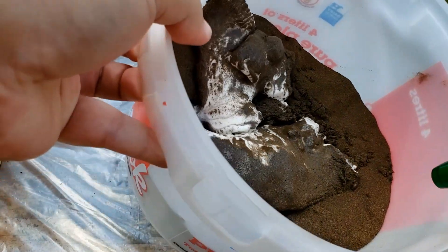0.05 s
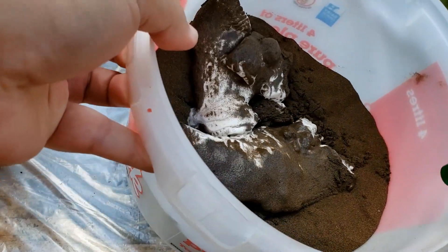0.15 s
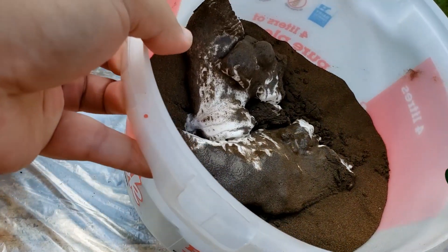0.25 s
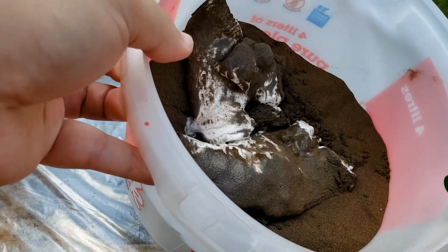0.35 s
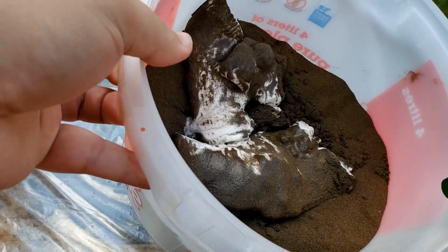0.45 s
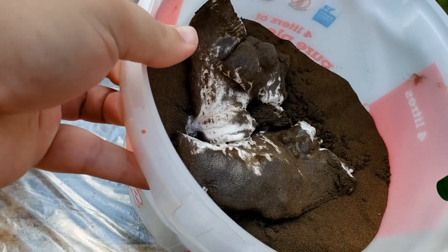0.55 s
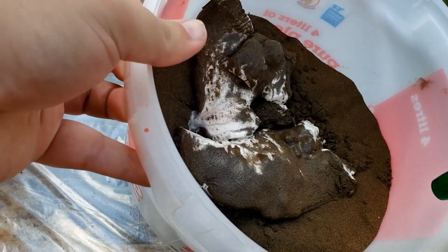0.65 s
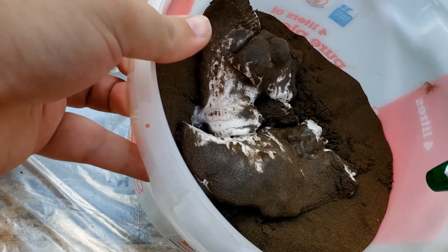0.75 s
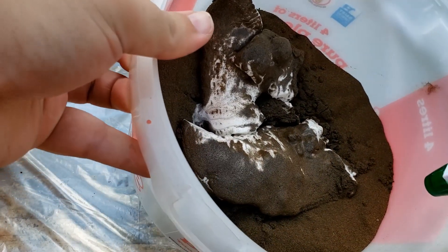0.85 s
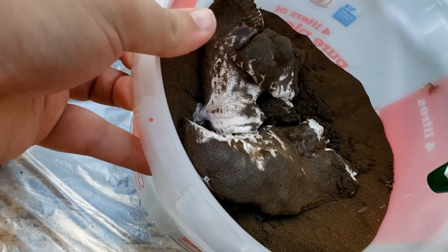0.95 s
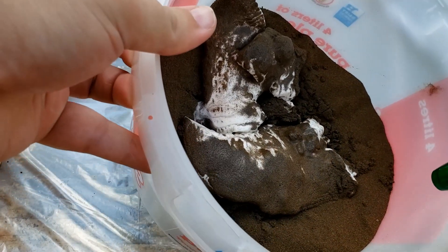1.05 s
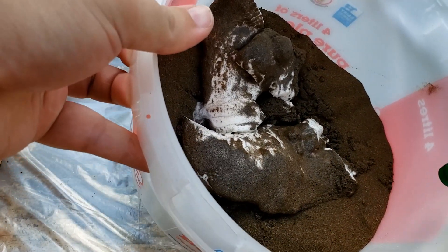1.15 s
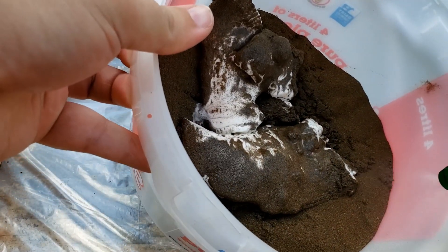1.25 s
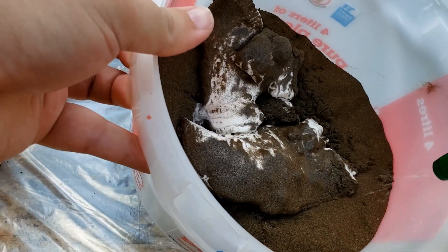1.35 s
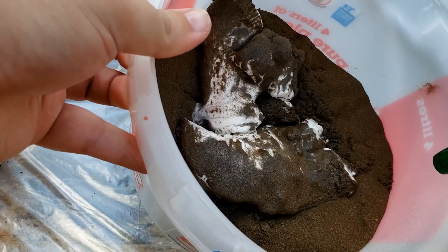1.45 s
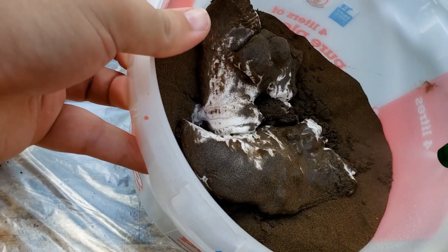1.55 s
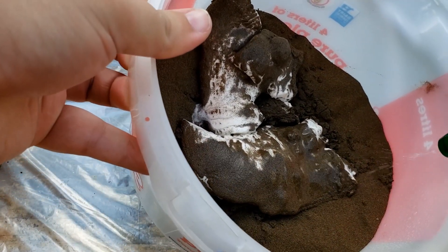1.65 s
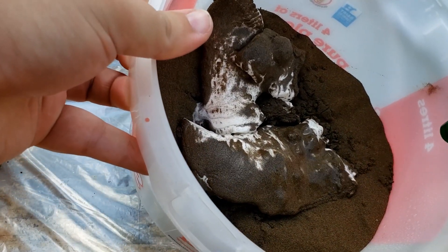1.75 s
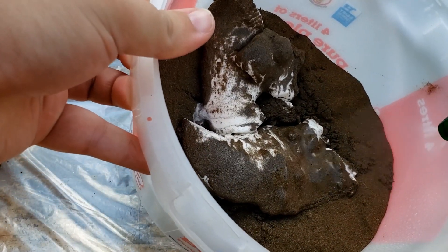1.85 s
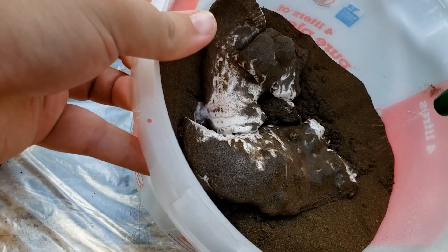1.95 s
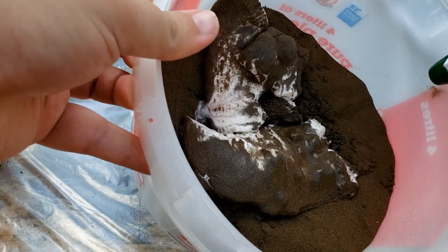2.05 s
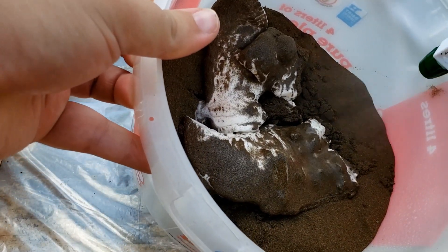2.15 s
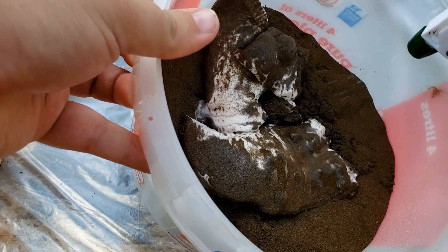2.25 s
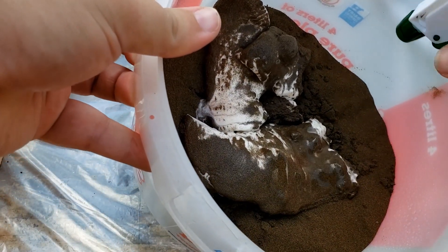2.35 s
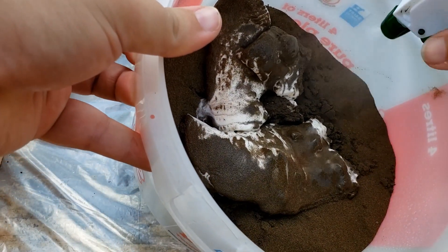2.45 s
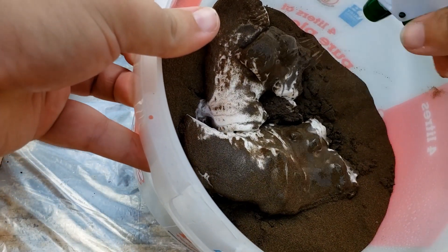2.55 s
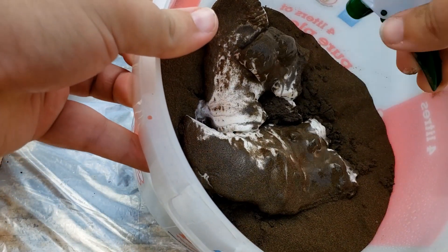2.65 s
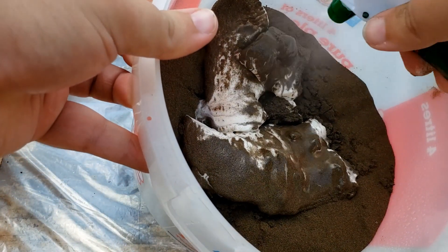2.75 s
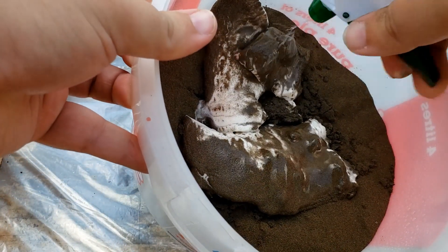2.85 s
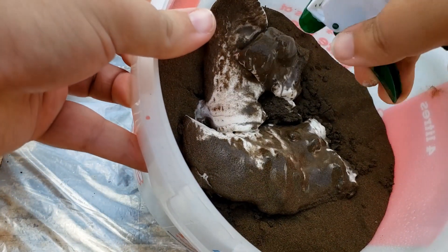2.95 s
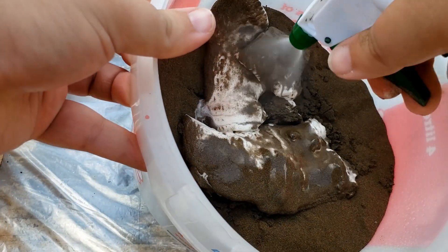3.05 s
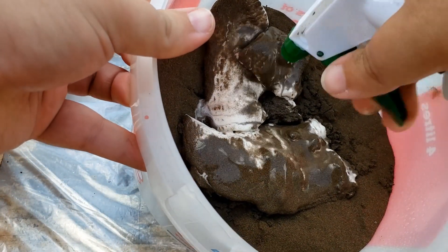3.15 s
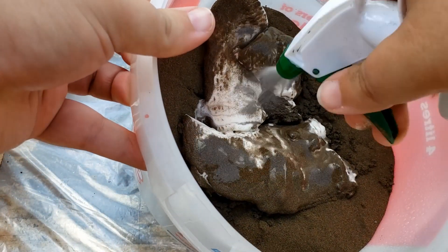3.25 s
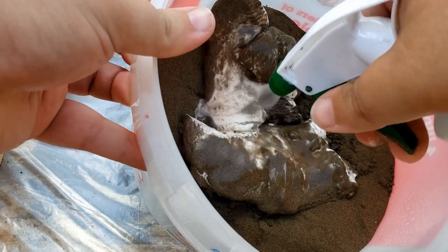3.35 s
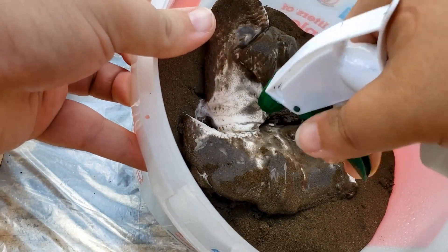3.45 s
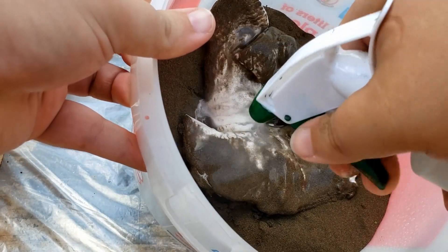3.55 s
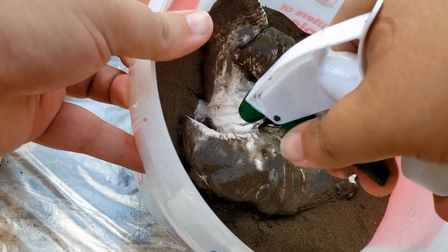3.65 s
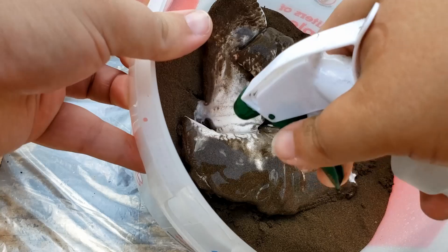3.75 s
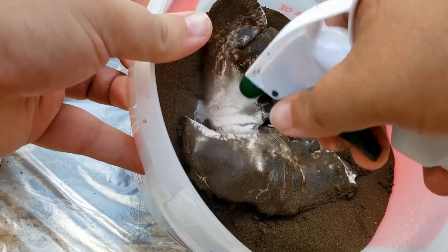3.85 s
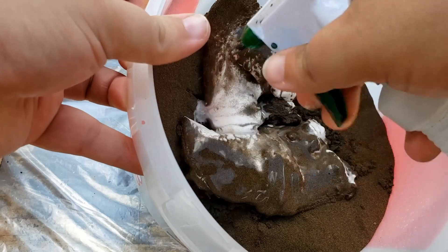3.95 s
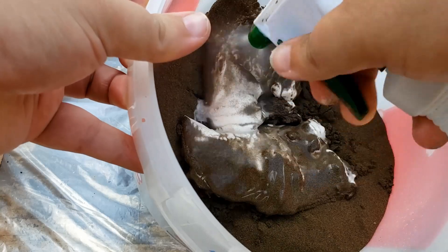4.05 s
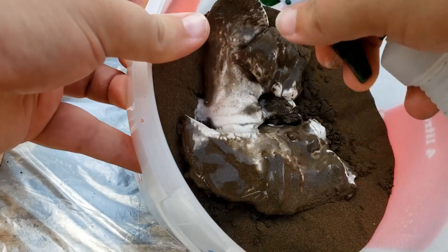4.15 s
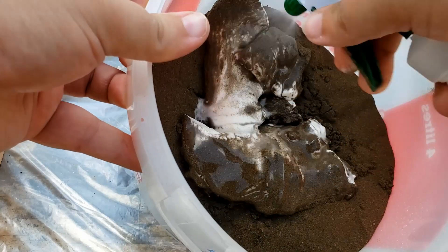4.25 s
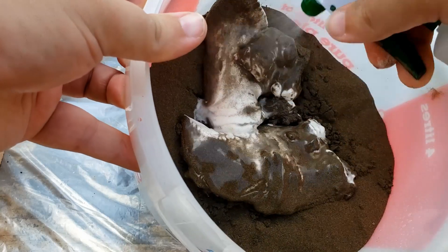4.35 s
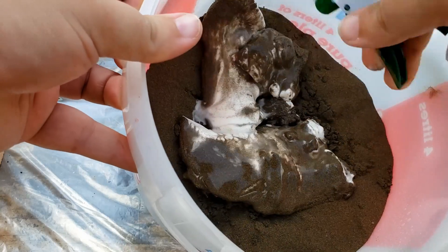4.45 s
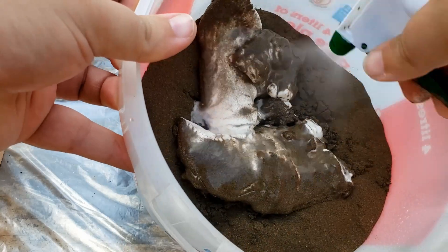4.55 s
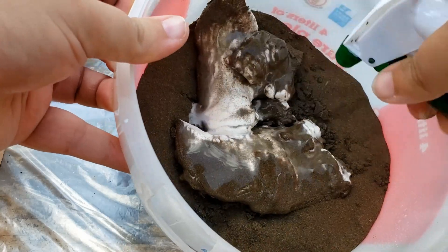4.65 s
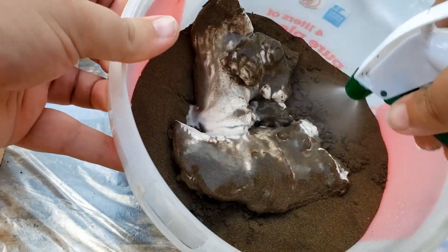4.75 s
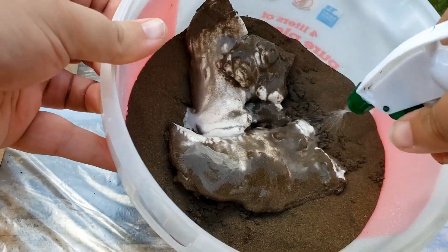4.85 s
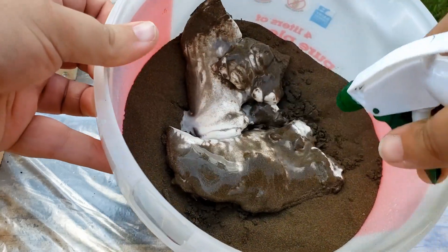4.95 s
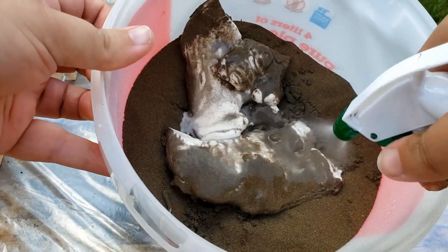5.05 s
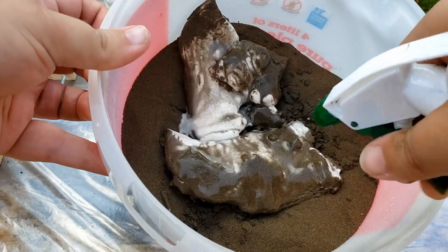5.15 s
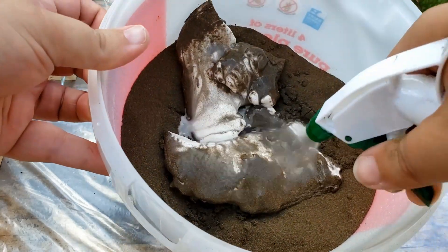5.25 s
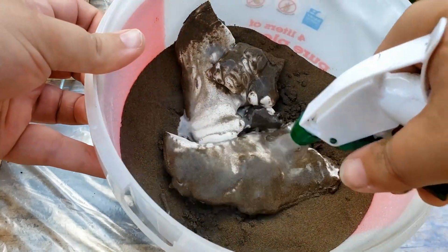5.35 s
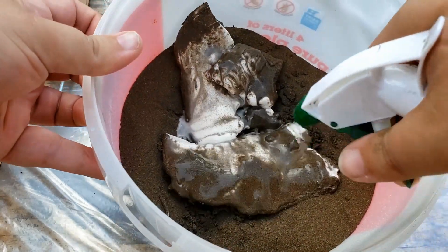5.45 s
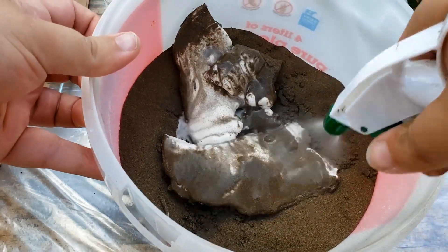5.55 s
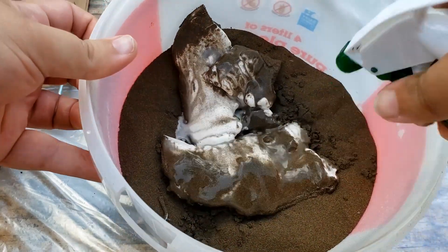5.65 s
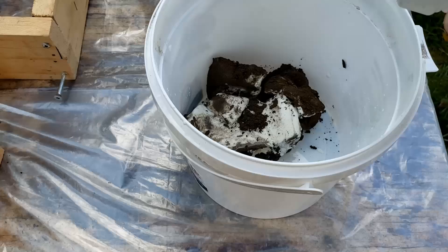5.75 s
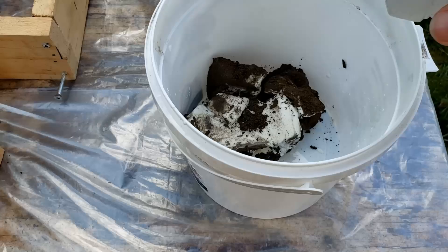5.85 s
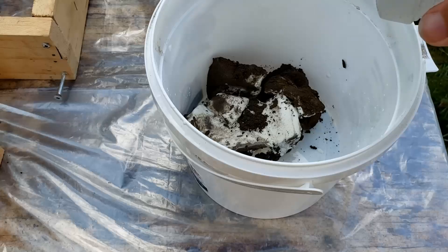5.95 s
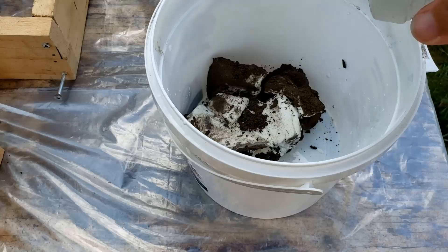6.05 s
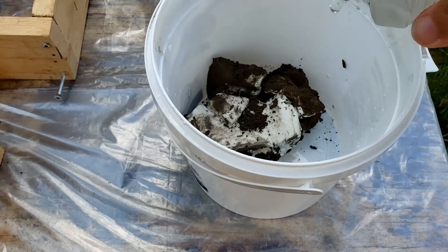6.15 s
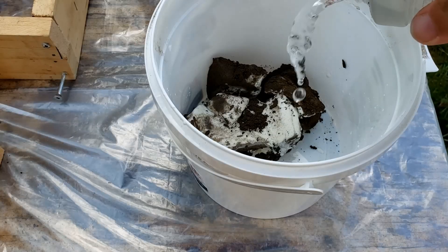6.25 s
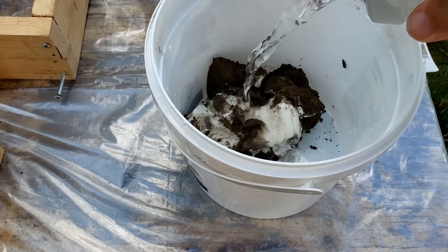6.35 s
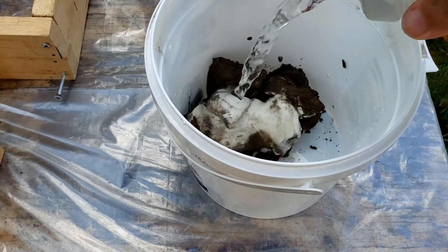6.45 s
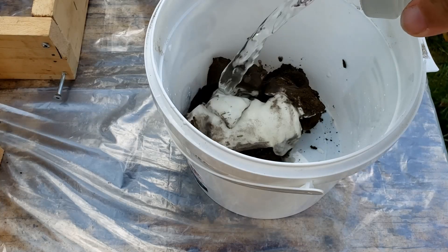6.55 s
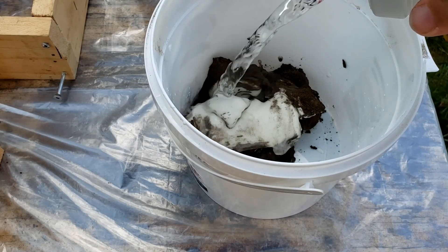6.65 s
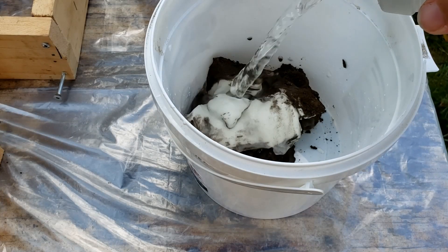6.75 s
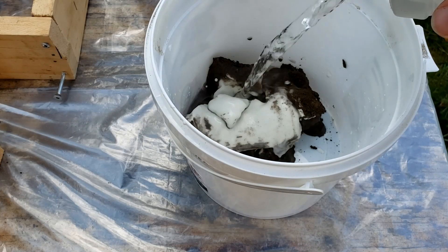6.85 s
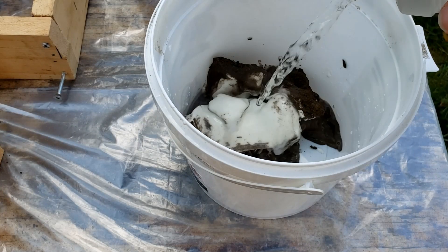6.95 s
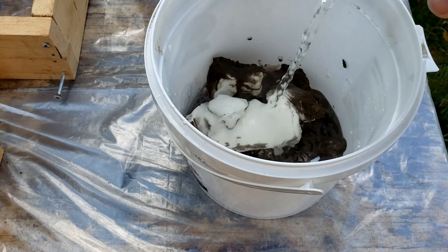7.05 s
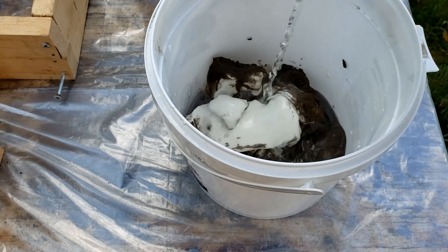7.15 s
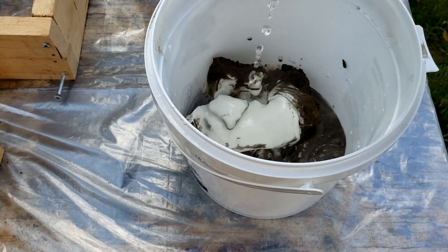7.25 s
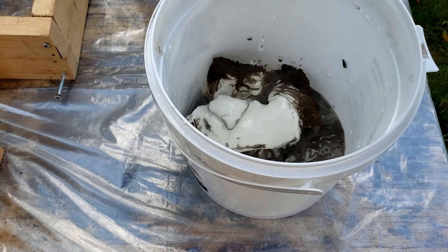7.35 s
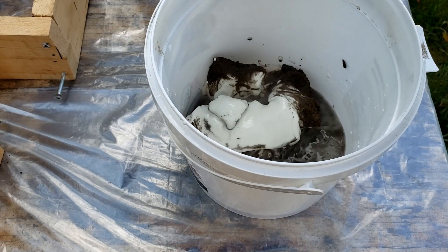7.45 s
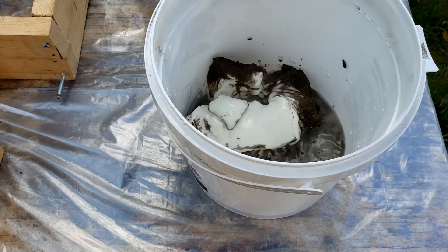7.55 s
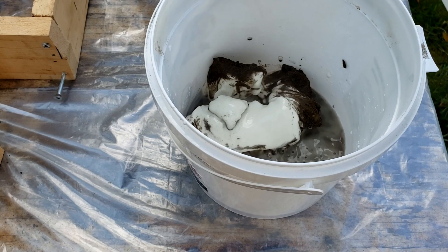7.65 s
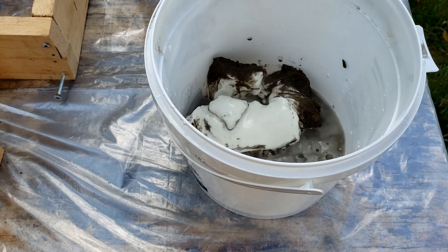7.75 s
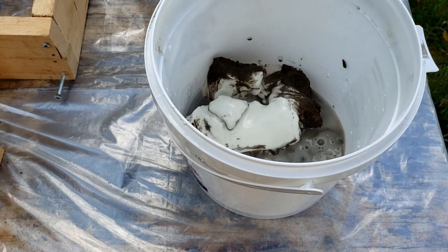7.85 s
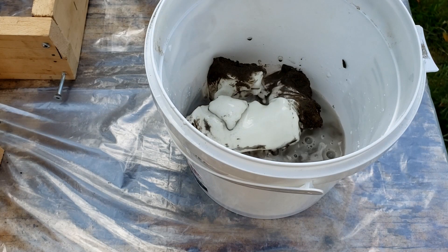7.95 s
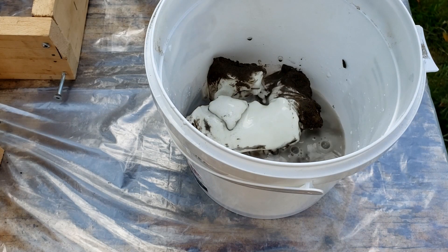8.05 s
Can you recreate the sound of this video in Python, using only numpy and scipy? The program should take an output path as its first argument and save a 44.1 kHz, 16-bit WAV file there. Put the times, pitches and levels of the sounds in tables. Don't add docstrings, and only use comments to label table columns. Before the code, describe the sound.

Close dry trigger clicks and sputters become rhythmic hissing spray bursts pattering on damp sand, a sharp plastic knock, then a short gurgling water pour outdoors.

```python
import sys
import numpy as np
from scipy import signal
from scipy.fft import rfft, irfft, next_fast_len
from scipy.io import wavfile
from scipy.ndimage import map_coordinates

SR = 44100
rng = np.random.default_rng(int(sys.argv[2]) if len(sys.argv) > 2 else 0)


def generate_wav(signal):
    frames = np.transpose(np.atleast_2d(signal))
    scaled = np.clip(frames, -1, 1) * 32767
    pcm = np.round(scaled).astype(np.int16)
    wavfile.write(sys.argv[1], SR, pcm)


def volts_from_db(level):
    exponent = np.asarray(level, float) / 20
    return 10 ** exponent


N = 357651
MOVE_S = 5.85

# frequency in Hz, density in dB per Hz.
AIR_NEAR_SPECTRUM = [(15, -41.5), (25, -8.5), (86, -2.5), (133, -1.5), (184, -16.5), (283, -13),
                     (788, -21.5), (926, -26), (2380, -32), (2650, -27), (3470, -45), (4930, -40),
                     (8910, -56), (11700, -45.5), (15700, -52)]
# frequency in Hz, density in dB per Hz.
AIR_FAR_SPECTRUM = [(15, -44), (25, -20), (64, 0), (96, -4.5), (184, -19), (234, -22.5), (380, -22.5),
                    (586, -29), (788, -32), (2650, -48.5), (4670, -57), (6810, -61.5), (9930, -65.5),
                    (12000, -55), (15700, -54.5)]
# frequency in Hz, likeness 0-1.
AIR_LIKENESS = [(25, .6), (60, 0.96), (130, 0.8), (290, .75), (640, 0.18), (1400, 0.02), (16000, 0.02)]
# frequency in Hz, width in Hz, level near the bucket in dB re load, level further off in dB.
MOTOR_ORDERS = [(63, 13, -2, -4), (88.97, 4.4, -1, -2), (149.6, 9.3, -8.5, -17.5), (176.3, 5.3, -16, -8.5)]
# time in seconds, level in dB.
MOTOR_LOAD = [(0.0, -43.5), (0.16, -52.5), (0.45, -53.5), (0.7, -54.5), (2.1, -50.5), (3.0, -51.5),
              (4.0, -50), (5.5, -56), (5.92, -51.5), (6.6, -50), (6.93, -50), (7.43, -51.5), (7.91, -45.5),
              (8.1, -47)]
# centre in seconds, length in seconds, start pitch in Hz, end pitch in Hz, level in dB.
CHIRPS = [
    (6.04, 0.12, 7190, 7613, -93.5),
    (6.177, 0.25, 7904, 8350, -90.5),
    (6.375, 0.062, 7707, 7760, -82.5),
    (7.759, .09, 8300, 8400, -83),
    (7.844, 0.104, 7580, 7530, -78),
    (8.081, 0.07, 8210, 8070, -86),
]

# start in seconds, length in seconds, hiss level in dB, mist level in dB.
PRIMING = [
    (0.0, 0.056, -69.5, -67.5),
    (0.095, 0.087, -74, -74.5),
    (0.275, 0.058, -46, -55.5),
    (0.42, 0.055, -65.5, -73),
    (0.578, 0.046, -56, -57),
    (0.764, 0.034, -69, -75),
    (0.933, 0.091, -50.5, -62.5),
    (1.058, 0.051, -61, -71),
]
# start in seconds, length in seconds, hiss level in dB, mist level in dB, fade in dB.
STROKES = [(1.281, 0.13, -41.5, -44, 10), (1.593, 0.12, -42.5, -43.5, 1.5),
           (1.887, 0.12, -42.5, -43.5, -0.5), (2.192, 0.097, -42.5, -42, -3),
           (2.484, 0.11, -43.5, -42.5, 2), (2.777, 0.11, -40.5, -41, -0.5), (3.071, 0.11, -42, -43, 1),
           (3.339, 0.1, -43.5, -43, -4), (3.594, 0.11, -40.5, -41, -3.5), (3.863, 0.11, -41, -42.5, 6.5),
           (4.104, 0.099, -40.5, -42.5, 1.5), (4.333, 0.11, -38.5, -42, -4),
           (4.577, 0.12, -38.5, -41.5, 7.5), (4.819, 0.11, -41.5, -42.5, -2.5),
           (5.078, 0.1, -39.5, -40.5, 5.5), (5.333, 0.1, -40.5, -41.5, -1), (5.569, 0.11, -41.5, -42, 8),
           (5.812, 0.019, -53.5, -54, 18)]
# share of its length, hiss gain in dB, mist gain in dB.
PRESSURE = [
    (-.2, -31.5, -28.5),
    (0., -6, -8.5),
    (.15, -2, 0.5),
    (.45, 2.5, 5),
    (.7, 0.5, 5),
    (1., -7, -6.5),
    (1.25, -26.5, -24),
    (2.2, -27.5, -24),
    (3.5, -68, -63.5),
]
# frequency in Hz, density in dB per Hz.
NOZZLE_SPECTRUM = [(1470, -27.5), (2500, -2), (3030, -21.5), (3670, 4.5), (4220, -3), (4810, 0.5),
                   (5310, -1), (7110, -12), (8360, -12), (11100, 0.5), (15100, 2), (15700, 2)]
# frequency in Hz, density in dB per Hz.
MIST_SPECTRUM = [(180, -50), (300, -12.5), (482, -2), (1260, -3), (1660, -4), (1920, -1), (2310, -4),
                 (2860, -3), (7000, -11.5), (9100, -50.5), (15400, -120)]
# frequency in Hz, width in Hz, level in dB.
WHISTLES = [(11250, 500, -5.5), (15200, 1000, 0.5), (4700, 400, -2.5), (6500, 500, -5.)]
# time in seconds, peak in dB, centre in Hz.
NOZZLE_SPITS = [(1.2826, -23, 14900), (1.352, -34, 15200), (1.583, -38, 15000), (2.1981, -50, 15300),
                (2.2005, -30, 11650), (2.7792, -37, 14900), (3.3514, -32, 14300), (3.5625, -45, 10400),
                (4.0938, -42, 15000), (4.1097, -37, 14900), (4.3362, -28, 15300), (4.337, -35.5, 11000),
                (4.5742, -30, 11400), (4.600, -23, 11400), (4.601, -26, 14740), (5.5539, -32, 12000)]
# time in seconds, share inside the bucket 0-1, position across (0 middle, about
AIM = [(.3, 1, 1.6, 0.2), (.97, 0.64, 2.2, 0), (1.35, 0., 0.23, .1), (1.65, 0.15, 0.45, .1),
       (1.95, 0.04, -0.29, 0.3), (2.24, 0.5, -0.67, 0.2), (2.53, 0.59, -0.87, 0.62),
       (2.83, 0.82, 0.058, 0.4), (3.12, 1, -1.4, 0.23), (3.391, 0.98, -1.2, 0), (3.65, 0.92, -0.37, 0.35),
       (3.91, 1.01, -0.68, 0.7), (4.15, 1, -0.11, 1), (4.39, 1, 0.54, 0.7), (4.63, 1, -0.16, 0.23),
       (4.87, 0.86, -0.066, 0.97), (5.13, 0.73, 0.69, 0), (5.39, 0.94, 1.1, 0), (5.62, 0.89, 0.38, 0.03)]
# frequency in Hz, width in Hz.
BUCKET_MODES = [(1360, 670), (2050, 560), (2870, 270), (3650, 700)]
# level from outside in dB, level from inside in dB,
# dB per unit across, dB per unit down.
MODE_AIM = [(-26.5, -11, -7.5, 12), (-1.5, -6.5, 6.5, 3.5), (-24.5, 0, 5.5, -6), (-14.5, 6, 3.5, -4.5)]
# frequency in Hz, width in Hz.
RIM_NOTCHES = [(1600, 670), (2950, 150), (4200, 110)]

# time in seconds, ring peak in dB, crack in dB, thump in dB.
PULLS = [(0.2449, -39, -46, -42), (0.2883, -49, -36.5, -63), (0.5915, -37, -47, -46.5),
         (0.957, -43, -41.5, -59), (1.259, -36, -45, -64), (1.581, -43, -42, -38),
         (1.8335, -55, -41.5, -42), (1.8777, -43.5, -49, -48), (2.162, -38, -37.5, -35.5),
         (2.1969, -44, -36.5, -42.5), (2.4685, -36, -38.5, -42), (2.755, -33.5, -51, -46),
         (3.0518, -53, -34.5, -35), (3.3261, -39, -37.5, -38.5), (3.5856, -40, -33, -30.5),
         (3.8533, -32, -34.5, -31.5), (4.3223, -48, -48, -40), (4.574, -29, -33, -34),
         (4.808, -31, -41, -40.5), (5.0529, -41, -38.5, -37), (5.3158, -25, -40.5, -36.5),
         (5.554, -54, -36.5, -36.5), (5.801, -44, -44, -37.5)]
# time in seconds, peak in dB.
RETURNS = [(0.019, -57), (0.104, -45), (2.015, -47), (2.912, -54), (3.2405, -45), (3.5346, -45),
           (3.7597, -40.5), (4.043, -42), (4.2616, -38), (4.49, -41), (4.752, -38), (5.2541, -39.5),
           (5.494, -39), (5.7266, -37.5)]
# time in seconds, peak in dB.
VALVE = [(0.154, -34), (0.8056, -38.5), (0.87, -46), (2.6882, -37.5), (2.9863, -34), (3.0444, -33.5),
         (3.2678, -34), (3.319, -35.5), (3.798, -34), (4.06, -42), (4.285, -42), (4.5313, -29.5),
         (5.2745, -36)]
# time in seconds, peak in dB.
SLACK = [
    (0.2575, -45.5),
    (1.0688, -52),
    (1.8653, -42.5),
    (2.136, -43),
    (2.4204, -44.5),
    (3.013, -46.5),
    (3.2934, -47),
    (3.5631, -45),
    (3.8254, -45.5),
    (4.0837, -47),
]
# time in seconds, peak in dB.
TICKS = [(.2179, -43), (.4614, -46), (.5616, -49), (.889, -42), (1.1164, -43.5), (1.129, -47),
         (1.2738, -28.5), (1.587, -39), (2.392, -49), (2.399, -52), (2.461, -42), (2.681, -44),
         (2.9809, -44), (3.2268, -54), (3.5356, -48), (3.578, -39), (3.7761, -53), (3.787, -42),
         (3.8474, -37), (4.016, -68), (4.054, -49), (4.2809, -51), (4.3263, -48), (4.527, -40),
         (4.568, -32), (4.5788, -30), (4.781, -46.5), (5.558, -36)]
# ring, crack, thump, all in dB re its peak.
RETURN_MIX = (-10, -39, 0.)
VALVE_MIX = (-1.4, -20.5, -14.5)
SLACK_MIX = (-30.5, 0., -1.4)
TICK_MIX = (1.5, -24, -16)
# frequency in Hz, level in dB, T60 in seconds.
PLASTIC_MODES = [(2460, -17.5, 0.034), (2850, 2.5, 0.018), (3600, -6.5, 0.0091), (4816, -16.5, 0.0081)]
# frequency in Hz, level in dB, T60 in seconds.
HOUSING_MODES = [(262, -5, 0.062), (363.4, 2.5, 0.039)]
# frequency in Hz, density in dB per Hz.
CRACK_SPECTRUM = [(1200, -26), (2500, 0), (3800, -4), (6500, -5), (8300, -24), (11000, -8), (15500, -9)]
# time in seconds, peak in dB, pitch in Hz, T60 in seconds.
SLOSH = [
    (0.0162, -35, 1230, 0.014),
    (0.019, -45, 1370, 0.027),
    (0.0418, -40, 1400, 0.016),
    (0.054, -40, 1380, 0.015),
    (0.09, -43, 1810, 0.041),
    (0.107, -42, 1290, 0.021),
]

# time in seconds, peak in dB.
SNAP = [
    (5.107, -6.5),
]
# frequency in Hz, level in dB, T60 in seconds.
SHELL_MODES = [(262, -34, 0.027), (1400, -8, 0.025), (2220, 2.5, 0.0071), (2850, -2.5, 0.022),
               (4700, -14, .005)]

# time in seconds, flow as splash level in dB, trapped air as gurgle level in dB.
POUR = [
    (6.39, -78, -84.5),
    (6.45, -61, -82),
    (6.584, -56, -49),
    (6.71, -56.5, -41.5),
    (6.85, -57, -50),
    (6.95, -52.5, -55.5),
    (7.05, -60.5, -55.5),
    (7.3, -66, -82),
    (7.58, -77, -82),
]
# frequency in Hz, density in dB per Hz.
SPLASH_SPECTRUM = [(760, -28), (1300, -20), (1490, -9), (2040, -13), (2480, -11.5), (2990, -11.5),
                   (3650, -10.5), (3970, -7), (8580, -22.5), (11100, -15.5), (15700, -12.5)]
# frequency in Hz, width in Hz, level in dB.
FAR_BUCKET_MODES = [(1520, 130, -5), (1773, 430, -0.5), (2590, 450, 1.5), (3630, 160, 6.5),
                    (5330, 920, 7.5)]
# time in seconds, peak in dB, pitch in Hz.
DROPS = [(6.4101, -45, 5740), (6.4323, -51, 4300), (6.4528, -48, 3820), (6.4804, -40, 3630),
         (6.493, -45, 4030), (6.502, -42, 2650), (6.518, -35, 1558), (6.54, -24, 4660), (6.576, -37, 3620),
         (6.581, -34.5, 1600), (6.59, -29, 3600), (6.596, -26, 3620), (6.5992, -34, 2430),
         (6.624, -35, 5770), (6.6548, -42, 1350), (6.6646, -37, 1350), (6.681, -22.5, 1460),
         (6.686, -42, 1480), (6.7046, -30, 1330), (6.7266, -26.5, 1520), (6.8186, -42, 1570),
         (6.8258, -39, 1600), (6.8373, -31, 1750), (6.851, -29, 3600), (6.898, -25.5, 2400),
         (6.946, -24, 3220), (6.9655, -26, 3550), (6.988, -28, 3570), (7.002, -30, 2620),
         (7.019, -32, 1470), (7.0403, -30, 3370), (7.013, -33, 3300), (7.045, -42, 1400),
         (7.059, -39, 1510), (7.072, -40, 2520), (7.074, -45.5, 1618), (7.088, -41, 1500),
         (7.11, -51, 2310), (7.1505, -56, 5340), (7.168, -49, 3750), (7.2195, -42, 3690),
         (7.2802, -38, 3620), (7.286, -38, 2740), (7.297, -33, 2800), (7.304, -27.5, 3290),
         (7.311, -31, 3500), (7.221, -42, 2000), (7.199, -48, 3660), (7.316, -38, 1695), (7.348, -34, 2850),
         (7.3737, -51.5, 3680), (7.408, -53.5, 3630)]
# time in seconds, peak in dB, pitch in Hz, T60 in seconds.
DRIPS = [(7.4883, -50, 1610, 0.022), (7.524, -33, 3010, 0.014), (7.5344, -30, 1880, 0.011),
         (7.5706, -40.5, 1650, 0.039), (7.587, -40, 1609, 0.057), (7.594, -34, 1950, 0.02),
         (7.536, -55, 3150, 0.045), (7.548, -45, 1700, .015), (7.574, -53, 4100, 0.033),
         (7.61, -54, 1620, .05), (7.628, -58, 2300, .03), (7.659, -57, 1430, .04)]
# time in seconds, peak in dB, centre in Hz.
POUR_SPITS = [(6.4116, -36, 11100), (6.4135, -42, 7300), (6.513, -35, 10500), (6.5182, -30.5, 9300),
              (6.5395, -37, 14500), (6.5959, -55.5, 13100), (6.663, -38, 8600), (6.7784, -50, 14800),
              (6.8154, -35, 13400), (6.827, -42, 7400), (6.869, -34, 12600), (6.8972, -41, 6690),
              (6.9141, -47, 6000), (6.9455, -44, 6920), (6.9458, -38, 4500), (6.9462, -40.5, 11000),
              (6.99, -39, 12500), (7.001, -38, 12500), (7.02, -39, 12000), (7.0398, -40, 5410),
              (7.0722, -46, 5600), (7.104, -55, 6500), (7.117, -58, 5200), (7.129, -56, 6300),
              (7.145, -51.5, 6500), (7.157, -50, 5800), (7.17, -51, 5600), (7.191, -45, 5890),
              (7.199, -49.5, 6500), (7.2164, -46, 5160), (7.229, -42, 4150), (7.238, -52, 6000),
              (7.259, -44, 4250), (7.2793, -44, 5330), (7.333, -50, 4320), (7.3735, -53, 4880),
              (7.4095, -51, 5030), (7.4599, -54, 5420), (7.5496, -56, 6570), (7.1506, -46, 12800),
              (7.2609, -50, 14200), (7.2883, -42, 11300), (7.306, -38, 5500), (7.3135, -32, 13000),
              (7.315, -34, 6000), (7.3465, -30.5, 10200), (7.4085, -41, 11470), (7.4893, -50, 4533),
              (7.5243, -41.5, 6500), (7.572, -47, 5540), (7.593, -57, 4000)]

# frequency in Hz, likeness 0-1.
CLOSE_LIKENESS = [(30, 0.65), (70, 0.88), (400, 0.86), (1500, 0.7), (4000, 0.21), (9000, 0.19),
                  (16000, 0.16)]
# time in seconds, lag in samples.
LEFT_LAG = [(0, 7), (2.3, 5.5), (3.2, 1), (4.3, 2.5), (5.2, 4.5), (5.8, 2), (8.1, -3)]
# frequency in Hz, left minus right in dB.
PORT_TILT = [(60, 0), (140, 2.5), (400, 1.5), (2000, 2.), (3500, 3.5), (5500, .5), (7000, -5), (7800, -13),
             (8400, -8), (9200, -9.5), (10000, -9.5), (11500, -4), (13000, -3), (15500, 3.5)]


def rms_one(x):
    return x / np.sqrt(np.mean(x ** 2) + 1e-20)


def in_time(rows):
    s, *columns = np.transpose(sorted(rows))
    return [np.interp(np.arange(N) / SR, s, column) for column in columns]


def coloured(x, points):
    size = next_fast_len(N + SR // 10, True)
    edge = (size - N) // 2
    padding = [(0, 0)] * (np.ndim(x) - 1) + [(edge, size - N - edge)]
    wide = np.pad(x, padding, mode="reflect")
    bin_hz = np.maximum(np.arange(size // 2 + 1) * SR / size, 1)
    hz, gain = np.transpose(points)
    weight = np.interp(np.log(bin_hz), np.log(hz), gain)
    return irfft(rfft(wide) * weight, size)[..., edge:edge + N]


def shaped(x, spectrum):
    fine_hz = np.geomspace(10, SR / 2, 300)
    hz, db = np.transpose(spectrum)
    gain = volts_from_db(np.interp(np.log(fine_hz), np.log(hz), db))
    return rms_one(coloured(x, np.c_[fine_hz, gain]))


def pair(mid, side, likeness=CLOSE_LIKENESS):
    hz, alike = np.transpose(likeness)
    alike = np.clip(alike, 0, 1)
    mid = coloured(mid, np.c_[hz, np.sqrt(1 + alike)])
    side = coloured(side, np.c_[hz, np.sqrt(1 - alike)])
    return np.array([mid + side, mid - side])


def noise(likeness=CLOSE_LIKENESS):
    return pair(*rng.standard_normal((2, N)), likeness)


def drift(rate_hz):
    r = np.exp(-32 * np.pi * rate_hz / SR)
    white = rng.standard_normal((N + SR) // 16 + 2)
    slow = signal.lfilter([1], [1, -2 * r, r * r], white)[SR // 16:]
    return np.interp(np.arange(N) / 16, np.arange(len(slow)), rms_one(slow))


def ring(impulses, hz, t60_s):
    r, w = volts_from_db(-60 / (t60_s * SR)), 2 * np.pi * hz / SR
    return signal.lfilter([0, np.sin(w)], [1, -2 * r * np.cos(w), r * r], impulses + 1e-18)


def resonate(x, hz, width_hz):
    r = np.exp(-np.pi * width_hz / SR)
    alive = x + 1e-15 * (np.arange(np.shape(x)[-1]) % 3)
    zeros = np.array([1, 0, -1]) * (1 - r * r) / 2
    return signal.lfilter(zeros, [1, -2 * r * np.cos(2 * np.pi * hz / SR), r * r], alive)


def clicks(times_s, db):
    out = np.zeros(N)
    out[np.round(np.asarray(times_s) * SR).astype(int)] = volts_from_db(np.asarray(db))
    return out


def dying(impulses, t60_s):
    return signal.lfilter([1], [1, -volts_from_db(-60 / (t60_s * SR))], impulses + 1e-18)


def grains(per_s, spread_db):
    sizes = volts_from_db(spread_db * np.minimum(rng.exponential(1, N), 5)) * rng.choice([-1, 1], N)
    return sizes * (rng.random(N) < per_s / SR)


def in_bucket(x, modes, ring_db):
    return x + volts_from_db(ring_db) * sum(volts_from_db(db) * resonate(x, hz, width_hz) for hz, width_hz, db in modes)


def soft(x, cut_hz):
    return signal.sosfilt(signal.butter(2, cut_hz, fs=SR, output="sos"), x)


def outdoors():
    t = np.arange(N) / SR
    far = np.clip((t - MOVE_S) / 0.0029, 0, 1)
    white = noise(AIR_LIKENESS)
    air = (1 - far) * volts_from_db(-53) * shaped(white, AIR_NEAR_SPECTRUM)
    air = air + far * volts_from_db(-50.0) * shaped(white, AIR_FAR_SPECTRUM)
    white = noise(AIR_LIKENESS)
    drone = 0
    for hz, width_hz, near_db, far_db in MOTOR_ORDERS:
        order = resonate(resonate(white, hz, width_hz), hz, 3 * width_hz)
        drone = drone + volts_from_db(near_db + (far_db - near_db) * far) * rms_one(order)
    gust_db = 1.65 * (1 - 0.58 * far) * (drift(3.2) + 0.67 * drift(16))
    air = air * volts_from_db(gust_db)
    rasp = drift(250)
    for s, length_s, from_hz, to_hz, db in CHIRPS:
        half_s = length_s / 2
        hz = np.interp(t, [s - half_s, s + half_s], [from_hz, to_hz])
        phase = 2 * np.pi * np.cumsum(hz) / SR
        air += volts_from_db(db) * np.exp(-((t - s) / half_s) ** 2) * rasp * np.sin(phase)
    return air + volts_from_db(in_time(MOTOR_LOAD)[0]) * drone


def squeezes():
    t = np.arange(N) / SR
    share, *curves_db = np.transpose(sorted(PRESSURE))
    gains = np.zeros((2, N))
    bites_s = np.array(PULLS)[:, 0]
    for s, length_s, hiss_db, mist_db, fade_db in [(*row, 0) for row in PRIMING] + STROKES:
        near_bites_s = bites_s[np.abs(bites_s - s) < .012]
        start_s = max([s + share[0] * length_s, *near_bites_s])
        part = slice(max(round(start_s * SR), 0), round((s + share[-1] * length_s) * SR))
        done = (t[part] - s) / length_s
        fade = fade_db * (np.clip(done, 0, 1) - .5)
        gains[:, part] += [volts_from_db(db + np.interp(done, share, curve_db) - fade)
                           for db, curve_db in zip((hiss_db, mist_db), curves_db)]
    return gains * (t < MOVE_S)


def spits(rows):
    out, size = np.zeros(N), SR // 50
    decay = volts_from_db(-60 * np.arange(size) / (0.012 * SR))
    for (s, peak_db, hz), burst in zip(rows, rng.standard_normal((len(rows), size))):
        burst = burst + 5.7 * (np.arange(size) == 0)
        one = resonate(burst * decay, hz, 0.13 * hz)
        start = round(s * SR)
        out[start:start + size] += volts_from_db(peak_db) * one / np.abs(one).max()
    return out


def spray():
    hiss, mist = squeezes()
    inside, across, down = in_time(AIM)
    unprimed = np.arange(N) < 1 * SR
    sputter = volts_from_db(2 * drift(78) * unprimed)
    patter = shaped(pair(grains(9000, spread_db=1.5), grains(9000, spread_db=1.5)), MIST_SPECTRUM)
    modes = []
    for (hz, width_hz), (out_db, in_db, across_db, down_db) in zip(BUCKET_MODES, MODE_AIM):
        aim_db = out_db + (in_db - out_db) * inside + across_db * across + down_db * down
        modes.append((hz, width_hz, aim_db + 1.1 * drift(4.4)))
    landing = in_bucket(patter, modes, ring_db=-1.2)
    turbulence = shaped(noise(), NOZZLE_SPECTRUM)
    whistles = [(hz, width_hz, db + 7.5 * drift(9.)) for hz, width_hz, db in WHISTLES]
    swirl = in_bucket(turbulence, whistles, ring_db=-7.5)
    jet = hiss * volts_from_db(2.0 + 1.1 * drift(50)) * swirl
    jet = jet + mist * volts_from_db(-2.5 + 1.63 * drift(51)) * landing
    jet = jet * sputter + spits(NOZZLE_SPITS)
    at_rim = np.clip(0.9 + (.14 - 0.9) * inside, 0, 1)
    return jet - at_rim * sum(resonate(jet, hz, width_hz) for hz, width_hz in RIM_NOTCHES)


def contacts():
    kinds = ((RETURNS, RETURN_MIX), (VALVE, VALVE_MIX), (SLACK, SLACK_MIX), (TICKS, TICK_MIX))
    others = [(s, *(db + np.array(mix))) for rows, mix in kinds for s, db in rows]
    return np.transpose(PULLS + others)


def struck(times_s, peak_db, modes, uneven_db):
    luck_db = uneven_db * rng.standard_normal((len(times_s), len(modes)))
    return sum(ring(clicks(times_s, peak_db + db + luck_db[:, k]), hz, t60_s)
               for k, (hz, db, t60_s) in enumerate(modes))


def drop(hz, t60_s, rise):
    done = np.arange(int(t60_s * SR)) / (t60_s * SR)
    tone = np.sin(2 * np.pi * hz * t60_s * done * (1 + rise * done))
    return tone * (1 - np.exp(-14 * done)) * volts_from_db(8.0 - 60 * done)


def drops(rows):
    out = np.zeros(N)
    for s, peak_db, hz, t60_s, *_ in rows:
        one = drop(hz, t60_s, rise=0.019)
        start = round(s * SR)
        out[start:start + len(one)] += volts_from_db(peak_db - 8.0) * one
    return out


def trigger():
    s, ring_db, crack_db, thump_db = contacts()
    shut_s = np.array(VALVE)[:, 0]
    refill = np.cumsum(clicks(shut_s - 0.051, 0) - clicks(shut_s, 0))
    creaks_per_s = (22 + 92 * refill) * (np.arange(N) < MOVE_S * SR)
    creak_s = np.flatnonzero(rng.random(N) < creaks_per_s / SR) / SR
    grip_db = 4.5 * drift(7.3)[(creak_s * SR).astype(int)]
    creak_db = -64 + grip_db + 3.0 * rng.standard_normal(len(creak_s))
    pops = struck(s, ring_db - 4.5, PLASTIC_MODES, uneven_db=-1.0)
    pops += struck(s + 0.001169, ring_db - 7.5, PLASTIC_MODES, uneven_db=2.0)
    pops += struck(creak_s, creak_db, PLASTIC_MODES, uneven_db=3.5)
    thumps = soft(struck(s, thump_db - 4.0, HOUSING_MODES, uneven_db=4.), cut_hz=600)
    crack_env = dying(clicks(s, crack_db + 0.5), 0.034)
    dust_env = dying(clicks(creak_s, -75.5 + grip_db), 0.06)
    crack = shaped(noise(), CRACK_SPECTRUM) * (crack_env + dust_env)
    knock_rows = [(s, db - 10.0) for s, db, *_ in SLOSH] + [(s, db - 9.5) for s, db in RETURNS]
    knock_s, knock_db = np.transpose(knock_rows)
    knocks = soft(struck(knock_s, knock_db, SHELL_MODES[:3], uneven_db=3.5), cut_hz=4700)
    body = resonate(resonate(pops, 2900, 2600), 2900, 2600)
    return body + thumps + crack + volts_from_db(-4.5) * drops(SLOSH) + knocks


def snap():
    (s, peak_db), = SNAP
    blows = clicks([s, s + 0.00052, s + 0.00149], peak_db + np.array([-13., -6., -11.]))
    crack = shaped(noise(), CRACK_SPECTRUM) * dying(clicks([s + 0.00027], peak_db - 5.0), 0.0085)
    return crack + sum(volts_from_db(db) * ring(blows, hz, t60_s) for hz, db, t60_s in SHELL_MODES)


def water_levels():
    pool_s, stream_end_s, slug_s, drain_db_per_s = 6.75, 7.34, 7.585, 173.5
    t = np.arange(N) / SR
    splash_db, gurgle_db = in_time(POUR)
    slug_db = -260 * np.abs(t - slug_s)
    pool_db = -18 * np.clip((pool_s - t) / 0.083, 0, 1) + 5 * np.maximum(t - pool_s, 0)
    fizz_db = splash_db + pool_db - drain_db_per_s * np.maximum(t - stream_end_s, 0)
    splash_db = splash_db - 0.7 * drain_db_per_s * np.maximum(t - slug_s, 0)
    return np.maximum(gurgle_db, -51 + slug_db), np.maximum(fizz_db, -65 + slug_db), splash_db


def bubbles(per_s, low_hz, high_hz, cycles, spread_db):
    first = round(MOVE_S * SR)
    born, dealt = grains(per_s, spread_db)[first:], rng.integers(0, 12, N - first)
    ears = np.zeros((2, N - first))
    for k, hz in enumerate(np.geomspace(low_hz, high_hz, 12)):
        one = signal.oaconvolve(born * (dealt == k), drop(hz, cycles / hz, rise=0.074))[:N - first]
        ears += one * volts_from_db(3.8 * rng.standard_normal() * np.array([[1], [-1]]))
    ears = rms_one(in_bucket(ears, FAR_BUCKET_MODES, ring_db=8.0))
    return np.pad(ears, [(0, 0), (first, 0)])


def pour():
    gurgle_db, fizz_db, splash_db = water_levels()
    wet = np.arange(N) > POUR[0][0] * SR
    clumps_per_s = 5000 * volts_from_db(4.0 * drift(60))
    ears = volts_from_db(gurgle_db - 4.0) * bubbles(800, 1196, 2370, cycles=11.6, spread_db=0.5)
    deep_db = -61.0 + 0.66 * np.minimum(gurgle_db + 38.5, 0)
    ears += volts_from_db(deep_db) * bubbles(120, 472, 1060, cycles=32.0, spread_db=5.0)
    fizz_gain = volts_from_db(fizz_db + 0.6 + 4.4 * drift(27))
    ears += fizz_gain * bubbles(1500, 2220, 6700, cycles=23.0, spread_db=2.0)
    impacts = pair(grains(clumps_per_s, spread_db=0.0), grains(clumps_per_s, spread_db=3.5))
    ears += volts_from_db(splash_db + 8.0) * shaped(impacts, SPLASH_SPECTRUM)
    s, peak_db, hz = np.transpose(DROPS)
    t60_s = 0.018 * (2500 / hz) ** 0.44 * volts_from_db(-0.31 * (peak_db + 49))
    falling = list(zip(s, peak_db, hz, t60_s)) + DRIPS
    every_s, every_db = np.transpose(falling)[:2]
    slap_env = dying(clicks(every_s, every_db - 14.0), 0.058)
    slaps = spits(POUR_SPITS) + soft(shaped(noise(), SPLASH_SPECTRUM), cut_hz=4100) * slap_env
    return wet * ears + slaps + volts_from_db(-2.0) * in_bucket(drops(falling), FAR_BUCKET_MODES, ring_db=-9.5)


def scene():
    close = spray() + trigger() + snap() + pour()
    left_at = np.arange(N) - in_time(LEFT_LAG)[0]
    close[0] = map_coordinates(close[0], [left_at], order=3, mode="mirror")
    return close + outdoors()


def top_cut(x):
    return signal.sosfilt(signal.butter(12, 16650, fs=SR, output="sos"), x)


def record(dry):
    hz, tilt_db = np.transpose(PORT_TILT)
    ports = np.array([coloured(ear, np.c_[hz, volts_from_db(sign * tilt_db / 2)]) for ear, sign in zip(dry, (1, -1))])
    rounded = .8 * np.tanh(ports / .8)
    mix = coloured(rounded, [(22, .2), (45, 1), (15780, 1), (15840, volts_from_db(-46))])
    mix = mix * np.minimum((N - np.arange(N)) / (.012 * SR), 1)
    return top_cut(mix)


dry = scene()
out = record(dry)
generate_wav(out)
```